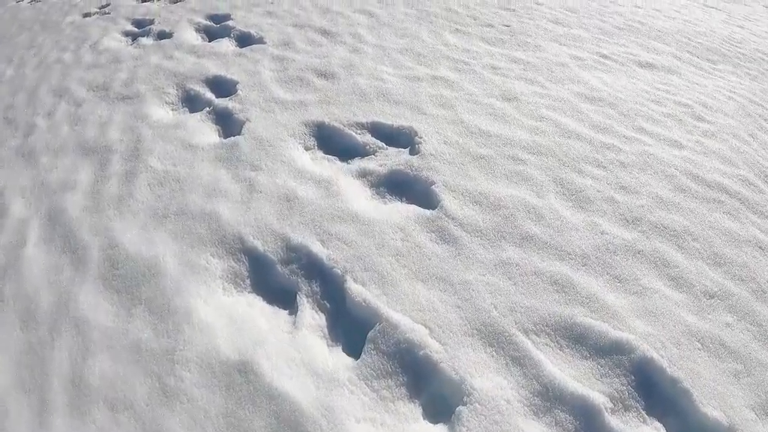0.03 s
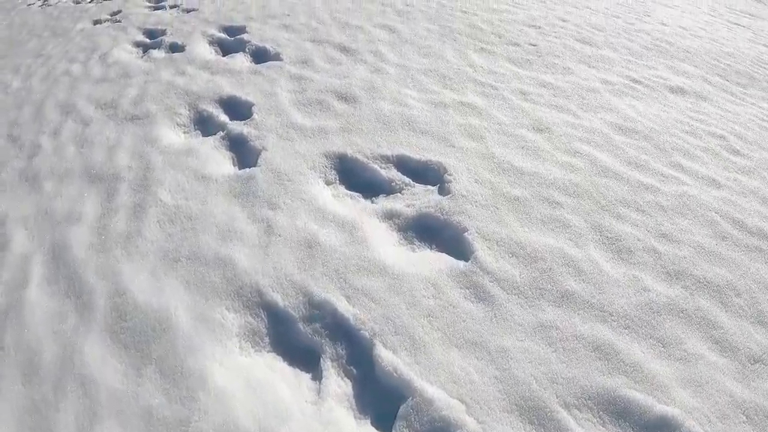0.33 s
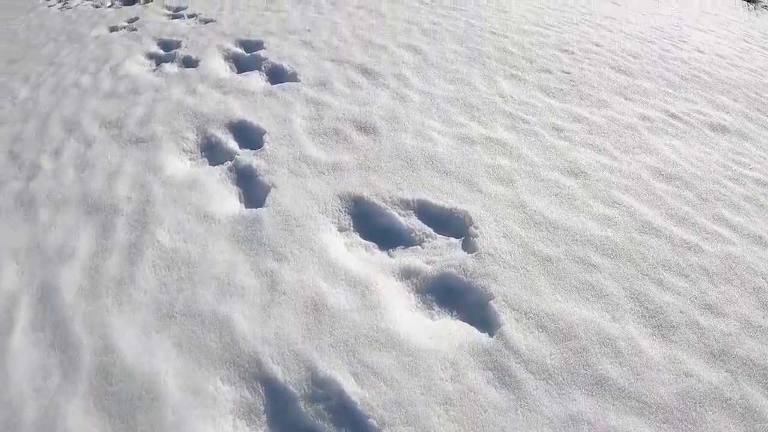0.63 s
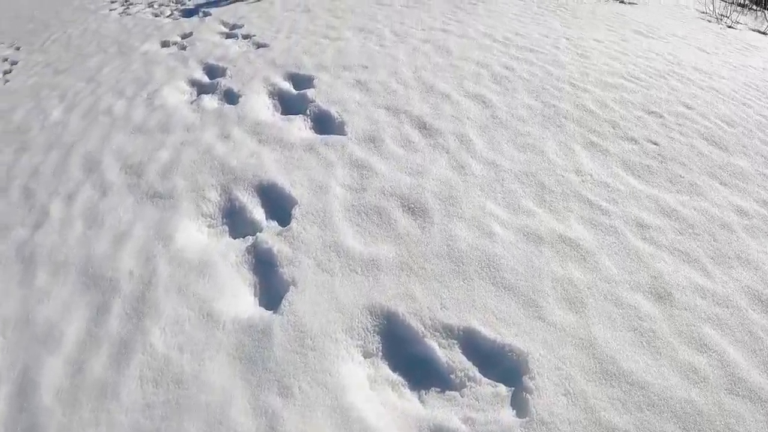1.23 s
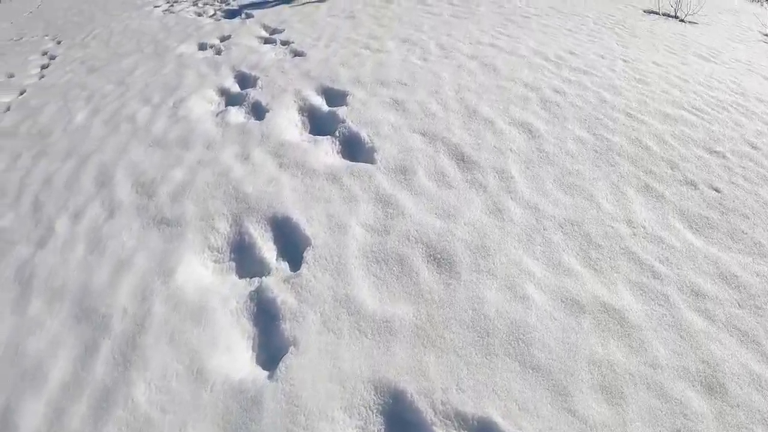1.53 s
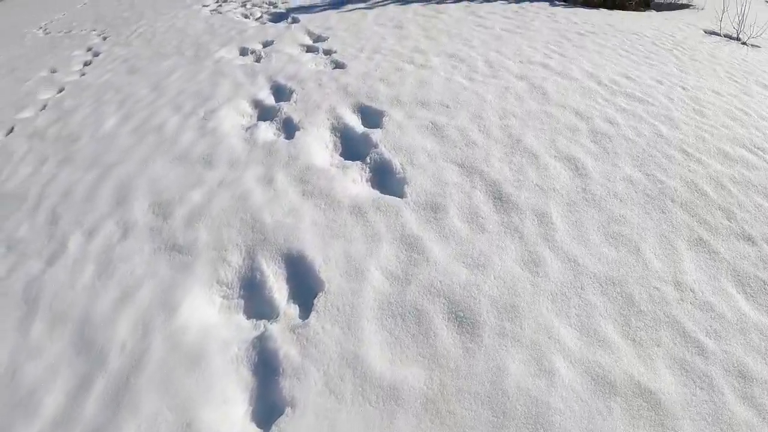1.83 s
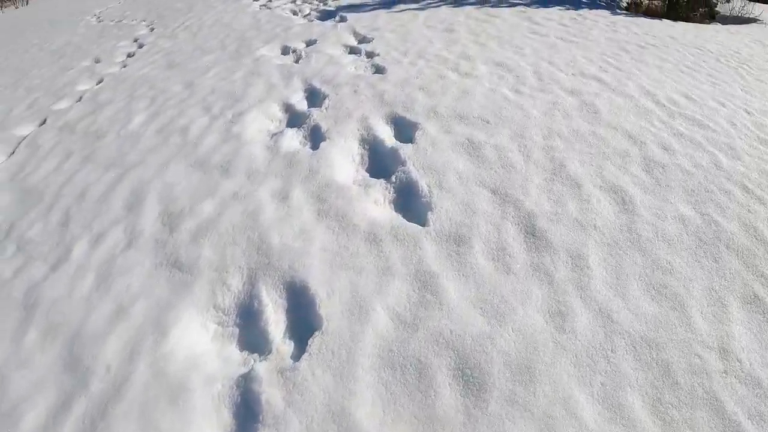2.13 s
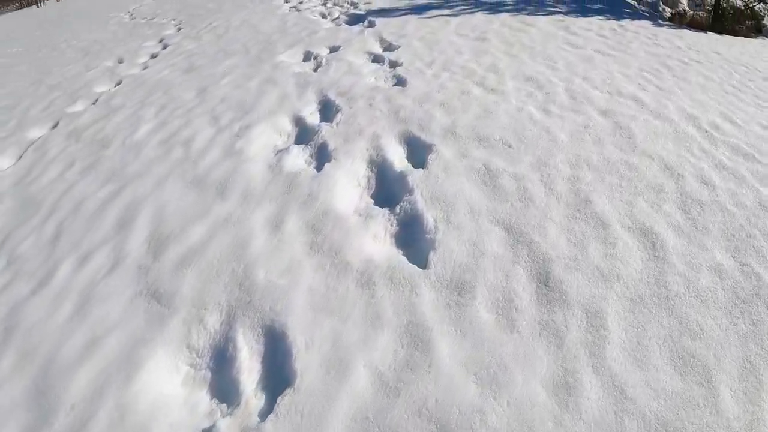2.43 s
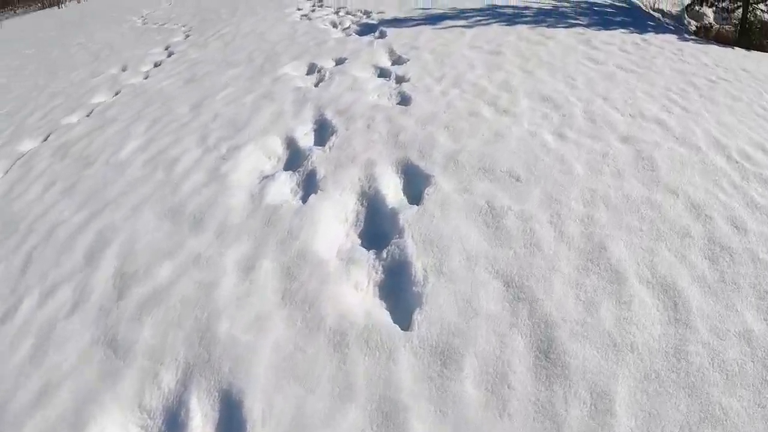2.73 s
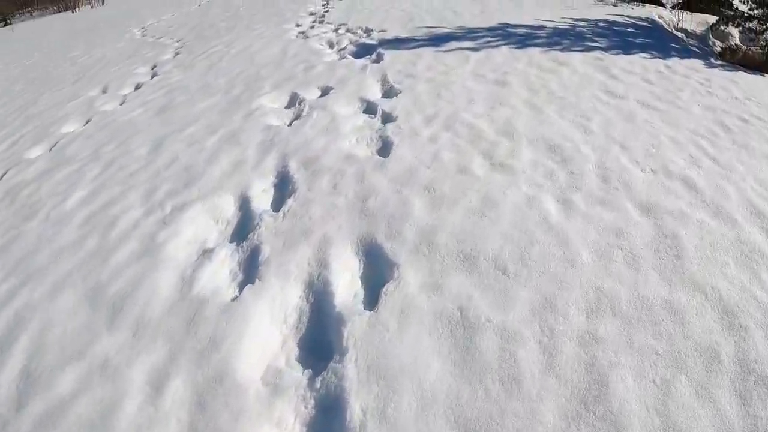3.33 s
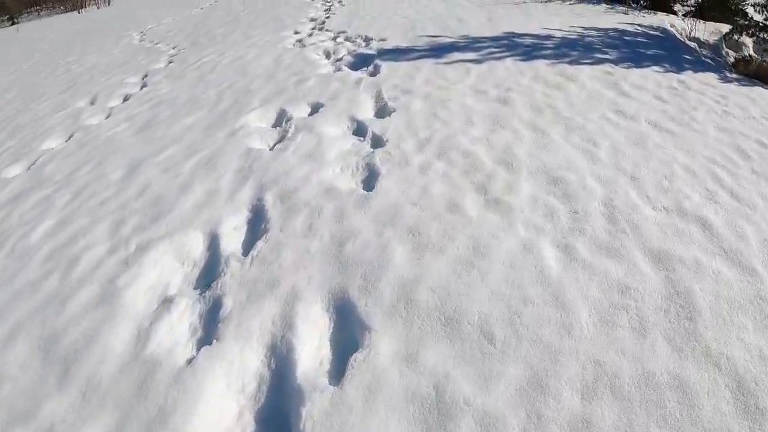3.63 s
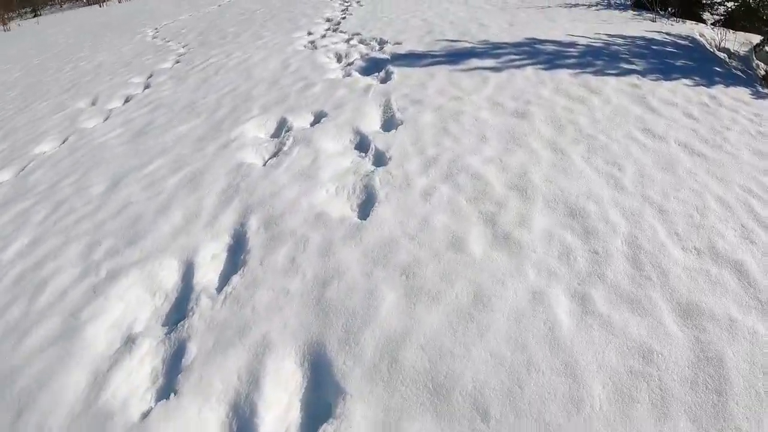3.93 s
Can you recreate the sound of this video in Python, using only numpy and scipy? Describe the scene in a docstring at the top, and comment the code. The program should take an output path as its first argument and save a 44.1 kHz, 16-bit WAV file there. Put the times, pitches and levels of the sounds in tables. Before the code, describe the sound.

Footsteps crunch through crusted snow at a walking pace, with a brief wind rumble.

```python
"""Someone walks across an open field of crusted snow, a step about every 0.65 s.
At first a gust buffets the microphone; it soon sinks to a faint rumble with the stride.
Under each boot the snow grinds grain by grain, patches of crust crunch and single plates snap.
The heaviest step lands near 1.4 s with a hollow thud, a faint, thin whistle follows at 1.7 s,
and the steps go on through the hush with no echo."""
import sys
import numpy as np
from scipy import signal
from scipy.fft import rfft, irfft
from scipy.io import wavfile
from scipy.ndimage import uniform_filter1d

SR = 44100
rng = np.random.default_rng(int(sys.argv[2]) if len(sys.argv) > 2 else 0)


def file_out(sig):
    """Save sig as 16-bit WAV at sys.argv[1]."""
    # one column per channel
    cols = np.atleast_2d(sig).T
    # limit, then scale
    lim = np.clip(cols, -1, 1)
    pcm = np.round(lim * 32767).astype(np.int16)
    wavfile.write(sys.argv[1], SR, pcm)


N = 4 * SR
T = np.arange(N) / SR


def amp(db):
    """Decibels to gain."""
    return 10 ** (np.asarray(db) / 20)


def unit_rms(x):
    """Scales to rms 1."""
    return x / np.sqrt(np.mean(x ** 2) + 1e-20)


def eq_db(points, hz):
    """Reads an EQ curve on a log-frequency axis."""
    f, db = np.transpose(points)
    return np.interp(np.log(hz + 1), np.log(f + 1), db)


def pan(left_db):
    """Stereo gains that put the left channel left_db above the right."""
    gains = amp([[left_db / 2], [-left_db / 2]])
    return gains / gains.mean()


def add(mix, start_s, sound):
    """Mixes a sound in at its cue."""
    part = mix[:, max(0, round(start_s * SR)):][:, :sound.shape[1]]
    part += sound[:, :part.shape[1]]


def noise(colour):
    """Steady noise shaped by an EQ curve."""
    gain = amp(eq_db(colour, np.fft.rfftfreq(N, 1 / SR)))
    return unit_rms(irfft(rfft(rng.standard_normal(N)) * gain, N))


def wander(n, step_s):
    """A random modulator that glides to a new value every step."""
    return np.interp(np.arange(n) / SR / step_s, np.arange(n), rng.standard_normal(n))


# colour of still air: f/Hz, level/dB
AIR_COLOUR = [(30, -3), (200, -0.5), (520, -10.5), (930, -14), (7800, -19), (14000, -29.5)]

def air(level_db=-70.5, centre_share=0.19):
    """The faint, wide hush of the open field."""
    centre = np.sqrt(centre_share) * noise(AIR_COLOUR)
    sides = np.sqrt(1 - centre_share) * np.array([noise(AIR_COLOUR), noise(AIR_COLOUR)])
    return amp(level_db) * (centre + sides)


# one arching call: t/s, length/s, level/dB, end f/Hz, top f/Hz
WHISTLE_CUE = (1.72, .21, -81, 7700, 10100)

def whistle():
    """A thin, high tone far off that rises and falls, perhaps a small bird."""
    start, length, db, end_hz, top_hz = WHISTLE_CUE
    arch = np.sin(np.pi * np.clip((T - start) / length, 0, 1))
    hz = (end_hz + (top_hz - end_hz) * arch) * (1 + 0.0083 * wander(N, 0.002))
    return amp(db) * np.sqrt(abs(arch)) * np.sin(2 * np.pi * np.cumsum(hz) / SR)


# fader ride of the buffeting: t/s, level/dB
WIND_RIDE = [(0, -29), (.08, -33.5), (.12, -38), (.24, -38), (.62, -44), (.83, -62), (.92, -45),
             (.98, -64.5), (1.1, -51.5), (1.28, -62), (2.06, -70), (2.15, -53.5), (2.58, -78), (2.95, -55),
             (3.04, -80), (3.28, -50), (4, -72)]
# colours of a light draught and of the full gust: f/Hz, level/dB
DRAUGHT_COLOUR = [(8, -2), (25, 7), (50, -1), (85, -20), (600, -62)]
GUST_COLOUR = [(8, -39), (58, 4.5), (100, 0), (185, -13), (260, -25), (900, -61.5)]

def wind(gust_from_db=-49.5, gust_range_db=16, puff_db=2.2):
    """Eddies hit the microphone in uneven puffs; the stronger the flow, the higher they reach."""
    level_db = np.interp(T, *np.transpose(WIND_RIDE)) + puff_db * wander(N, 0.02)
    gust = np.clip((level_db - gust_from_db) / gust_range_db, 0, 1)
    eddies = np.sqrt(1 - gust) * noise(DRAUGHT_COLOUR) + np.sqrt(gust) * noise(GUST_COLOUR)
    eddies /= np.sqrt(uniform_filter1d(eddies ** 2, size=5000) + 1e-6)
    sides = 0.19 * np.array([noise(DRAUGHT_COLOUR), noise(DRAUGHT_COLOUR)])
    return (eddies * pan(left_db=-6.5) + sides) * amp(level_db)


def scatter(x, send_db=-13.5, decay_s=0.0065, size=2200):
    """Adds faint, quick reflections off the walker's body and the snow nearby."""
    t = np.arange(size) / SR
    sparse = rng.standard_normal((3, size)) * (rng.random((3, size)) < 0.06)
    centre, left, right = sparse * (t > 0.002) * np.exp(-t / decay_s)
    taps = centre + 0.087 * np.array([left, right])
    return x + amp(send_db) * signal.oaconvolve(x, taps / np.linalg.norm(taps[0]), axes=1)[:, :N]


def grains(n, per_s, size_db=4, clump_db=5, clump_s=0.0028, colour_db=3):
    """Tiny fractures in clumps; each clump has its own colour, each grain its own size and direction."""
    struck = rng.random(n) < per_s / SR
    sizes_db = size_db * np.minimum(rng.exponential(1, n), 3)
    clicks = struck * amp(sizes_db + clump_db * wander(n, clump_s))
    edges_hz = np.geomspace(130, 15000, 12)
    out = np.zeros((2, n))
    for low, high in zip(edges_hz, edges_hz[1:]):
        push = clicks * rng.choice([-1, 1], n) * amp(colour_db * wander(n, 2 * clump_s))
        side = rng.standard_normal(n) * (0.23 + 0.11 * low / 9000)  # wider in the treble
        band = signal.butter(2, [low, high], "bandpass", fs=SR)
        out += signal.lfilter(*band, push * np.array([1 + side, 1 - side]) + 1e-18)
    return out


def steadied(grit, window_s, powder_db):
    """The boot feeds energy at a steady pace, shared between grains and the hiss of fine powder."""
    hiss = rng.standard_normal((3, grit.shape[1]))
    blend = unit_rms(grit) + amp(powder_db) * (hiss[0] + 1.4 * hiss[1:])
    width = max(2, int(window_s * SR))
    power = uniform_filter1d(uniform_filter1d(blend.mean(0) ** 2, width), width)
    return blend / np.sqrt(abs(power) + 1e-9)


def collapse(length, attack_s=0.0043, release_s=0.0069, sag_db=2.5):
    """The envelope of snow caving in: it starts quickly, sags and stops."""
    t = np.arange(0, length + 5 * release_s, 1 / SR)
    release = np.exp(-np.maximum(t - length, 0) / release_s)
    return np.minimum(t / attack_s, 1) * amp(-sag_db * t / length) * release


def soft_onset(x, swell_db=-12.5, swell_s=0.0023, size=600):
    """A faint, short swell of noise leads into each grain and softens its attack."""
    swell = rng.standard_normal(size) * np.exp(-np.arange(size, 0, -1) / SR / swell_s)
    kernel = np.r_[amp(swell_db) * swell / np.linalg.norm(swell), 1]
    return signal.oaconvolve(x, kernel[None] / np.linalg.norm(kernel))[:, size:]


# colour of breaking snow: f/Hz, level/dB
SNOW_COLOUR = [(60, -19), (130, -1), (200, -2), (400, -3), (800, -6.5), (1200, 0.4), (1700, -2.54),
               (2500, -6), (4000, -8), (5200, -12), (6200, -16.5), (7600, -18), (8600, -25), (12200, -31),
               (14000, -48)]

def snow_ring(low_hz, bright_db, shelf_from_hz=1620, shelf_full_hz=3680, size=2048):
    """The short, dead pulse one fracture sends through the snow; each piece rings at its own pitch."""
    hz = np.fft.rfftfreq(size, 1 / SR)
    detune_octaves = 0.3 * rng.uniform(-0.98, 1) * np.clip(2 - hz / shelf_from_hz, 0, 1)
    snow_db = eq_db(SNOW_COLOUR, hz / 2 ** detune_octaves)
    octaves_below = np.maximum(np.log2(low_hz / (hz + 1)), 0)  # little sound under the lowest ring
    db = snow_db - 5.5 * np.minimum(2 * octaves_below, 1) - 3.5 * octaves_below
    db += eq_db([(shelf_from_hz, 0), (shelf_full_hz, bright_db)], hz)
    log_gain = np.log(amp(np.r_[db, db[-2:0:-1]]))
    pulse = np.fft.ifft(np.exp(np.conj(signal.hilbert(log_gain)))).real  # minimum phase: a hard attack
    return pulse[None, :size // 2] / np.linalg.norm(irfft(amp(snow_db)))


def ring_pieces(grit, low_hz, bright_db, count=4, piece_s=0.008):
    """A run of fractures passes from one piece of crust to the next, each with its own ring."""
    slot = (np.arange(grit.shape[1]) / SR / piece_s).astype(int)
    piece = rng.integers(count, size=N)[slot]
    return sum(signal.oaconvolve(grit * (piece == k), snow_ring(low_hz, bright_db)) for k in range(count))


# thuds under the crust: t/s, length/s, level/dB, resonance f/Hz
HOLLOW_CUES = [(0.241, 0.027, -52.5, 348), (1.326, 0.082, -47.5, 218), (2.723, .045, -44.5, 700),
               (2.831, 0.044, -47.5, 797)]

def hollows(edge_ratio=1.29):
    """Snow giving way deeper down: a dull, grainy thud in a broad resonance."""
    out = np.zeros((2, N))
    grit = grains(N, per_s=3000)
    for start, length, db, hz in HOLLOW_CUES:
        band = signal.butter(3, [hz / edge_ratio, hz * edge_ratio], "bandpass", fs=SR, output="sos")
        body = steadied(signal.sosfilt(band, grit), window_s=0.0086, powder_db=-np.inf)
        envelope = collapse(length)
        add(out, start, body[:, round(start * SR):][:, :len(envelope)] * envelope * amp(db))
    return out


# the boot's load on the snow, step after step: t/s, level/dB
LOAD_RIDE = [(0, -52), (.2, -61.5), (.37, -59), (.6, -54.5), (.78, -50.5), (.88, -57.5), (1, -69),
             (1.2, -59), (1.36, -47.5), (1.58, -47.5), (1.66, -71.5), (1.8, -76), (1.88, -59), (2.07, -55),
             (2.14, -49.5), (2.3, -56.5), (2.58, -72), (2.69, -47.5), (2.88, -45.5), (2.95, -57),
             (3.04, -72.5), (3.24, -53), (3.44, -47), (3.72, -60.5), (3.88, -58), (4, -45)]

def grinding(full_load_db=-47, light_range_db=6, patchy_db=1.5, trim_db=-1):
    """Snow packing under the sole: more load makes it louder, denser, steadier and deeper."""
    load_db = np.interp(T, *np.transpose(LOAD_RIDE))
    per_s = 1500 * 10 ** ((load_db - full_load_db) / 18)  # a tenth of the grains at 18 dB less load
    grit = steadied(grains(N, per_s), window_s=0.046, powder_db=-19)
    # a light touch only rustles the icy surface, in fits
    light = np.clip((full_load_db - load_db) / light_range_db, 0, 1)
    grit *= amp(load_db + trim_db + patchy_db * light * wander(N, 0.031))
    packed = ring_pieces(grit * (1 - light), low_hz=855, bright_db=-1)
    brushed = ring_pieces(grit * light, low_hz=1180, bright_db=4)
    return (packed + brushed)[:, :N] * pan(left_db=3.5)


# patches of crust caving in: t/s, length/s, level/dB before trim, lowest ring f/Hz, brightness/dB
CRUNCH_CUES = [(0, 0.063, -47, 483, -3.5), (0.388, 0.043, -49.5, 970, 1.5), (0.468, 0.045, -45.5, 860, -2),
               (0.66, 0.049, -39, 950, -1.5), (0.746, 0.075, -46, 790, -4),
               (1.143, 0.019, -46.5, 2000, -0.5), (1.268, 0.033, -46.5, 900, -11),
               (1.323, 0.071, -40, 430, -12), (1.414, 0.047, -33.5, 242, -5.5),
               (1.472, 0.019, -34, 140, -5.5), (1.512, 0.093, -43, 230, -7.5),
               (2.111, 0.046, -45.5, 453, 2), (2.188, 0.073, -48.5, 930, 3), (2.72, 0.05, -38.5, 635, -0.5),
               (2.789, 0.051, -49.5, 540, 6.5), (2.857, 0.016, -45, 533, 5.5),
               (3.19, 0.037, -52, 1150, 1.5), (3.289, 0.043, -49, 950, 7.5), (3.37, 0.048, -40, 403, 2),
               (3.457, 0.084, -43.5, 1050, -0.5), (3.597, 0.0081, -37, 1020, 2.5),
               (3.905, 0.048, -48.5, 846, -7), (3.971, 0.039, -41, 620, -2.5)]

def crunches(trim_db=-1.5):
    """Each collapse of the crust is a dense run of fractures."""
    out = np.zeros((2, N))
    grit = steadied(grains(N, per_s=3000, size_db=4.5), window_s=0.007, powder_db=-14)
    for start, length, db, low_hz, bright_db in CRUNCH_CUES:
        envelope = collapse(length)
        run = grit.take(round(start * SR) + np.arange(len(envelope)), axis=1, mode="wrap") * envelope
        add(out, start, ring_pieces(run, low_hz, bright_db) * amp(db + trim_db))
    return out * pan(left_db=1)


# single plates of crust breaking: t/s, level/dB before trim, brightness/dB
SNAP_CUES = [(0.0563, -35, -5), (0.0881, -39.5, 7), (0.096, -27.5, -13.5), (0.168, -52, 2),
             (0.2327, -43, 3), (.352, -39.5, -13), (0.535, -39.5, 1.5), (0.6988, -34.5, -14),
             (1.017, -62, 19.5), (1.0735, -58, 15), (1.089, -60, 17.5), (1.2743, -32, -8), (1.32, -30, -11),
             (1.3425, -23.5, -14), (1.374, -25.5, -9), (1.4214, -24.5, -13), (1.4432, -25.5, -9),
             (1.4514, -22.5, -13.5), (1.478, -21, -19), (1.503, -30.5, -1), (1.554, -29.5, -14.5),
             (1.5627, -28.5, -5.5), (1.577, -26.5, -18.5), (1.931, -57.5, 19.5), (1.9665, -36, 2),
             (2.0445, -26, -6), (2.101, -37.5, -13), (2.151, -31, -2), (2.2494, -37.5, 5.5),
             (2.339, -42, 7.5), (2.552, -55, 8), (2.742, -28, -6), (2.8759, -33, 4), (2.981, -38.5, 2),
             (3.0743, -42.5, 7.5), (3.1104, -44, 4.5), (3.2059, -36.5, -0.5), (3.2824, -38, 9),
             (3.2989, -39, 10), (3.3297, -23, -1.5), (3.386, -26.5, -8), (3.504, -35, 3), (3.6088, -29, -1),
             (3.6383, -34, 2.5), (3.6722, -37, 2.5), (3.845, -31, -5.5), (3.9156, -29, -11),
             (3.932, -28, -10)]

def snaps(rise_s=0.00067, splinter_s=0.0025, splinter_db=-4.5, big_db=-18, trim_db=-0.5, size=1024):
    """A plate breaks: a very brief swell of crackle, a sharp snap, then splinters."""
    out = np.zeros((2, N))
    lead = size // 4
    t = (np.arange(size) - lead) / SR
    envelope = np.exp(np.minimum(t / rise_s, -t / splinter_s))
    for start, db, bright_db in SNAP_CUES:
        crack = grains(size, per_s=2500, size_db=-2.5) * envelope
        crack *= amp(splinter_db) / (np.linalg.norm(crack.mean(0)) + 1e-9)
        crack[:, lead] -= 1  # the break itself
        crack *= np.sqrt(SR / 1000 / (1 + amp(splinter_db) ** 2))  # the energy of 1 ms at rms 1
        octaves_down = max(db - bright_db - big_db, 0) / 7  # loud, dull plates are larger and ring lower
        ring = snow_ring(low_hz=950 / 2 ** octaves_down, bright_db=bright_db)
        add(out, start - lead / SR, signal.fftconvolve(crack, ring) * amp(db + trim_db))
    return out * pan(left_db=4)


def scene():
    """Footsteps up front, over the wind and the quiet field."""
    steps = soft_onset(grinding()) + soft_onset(crunches()) + snaps() + hollows()
    return scatter(steps) + wind() + air() + whistle()


def record(dry):
    """A steep high cut at 14.4 kHz on the whole mix."""
    high_cut = signal.firwin(255, 14400, window=("kaiser", 8), fs=SR)
    return signal.oaconvolve(dry, high_cut[None], "same")


dry = scene()
out = record(dry)
file_out(out)
```